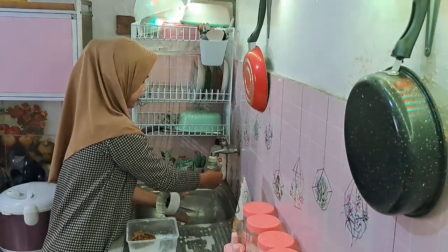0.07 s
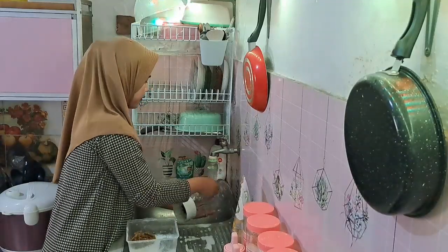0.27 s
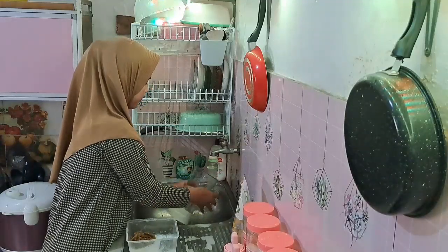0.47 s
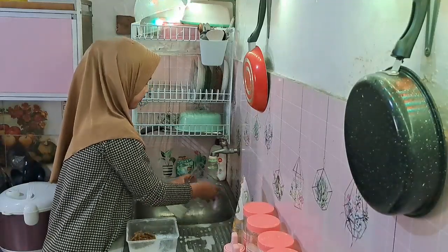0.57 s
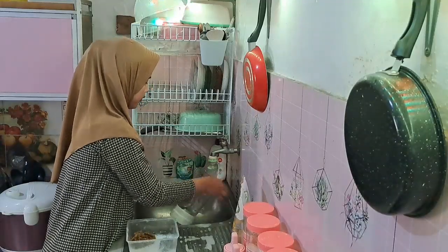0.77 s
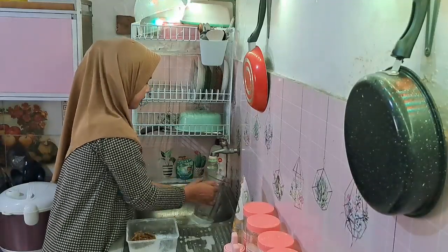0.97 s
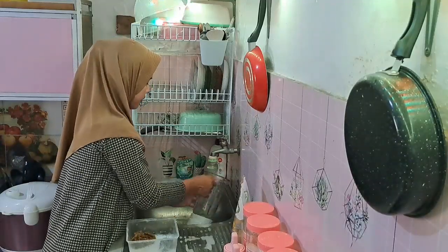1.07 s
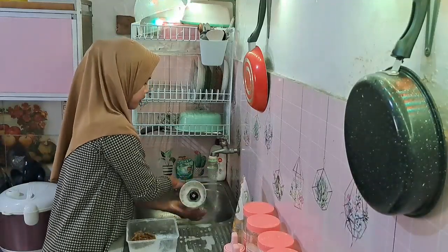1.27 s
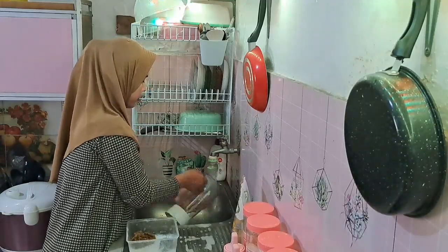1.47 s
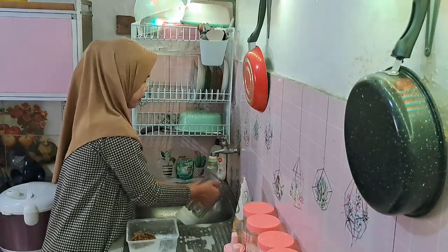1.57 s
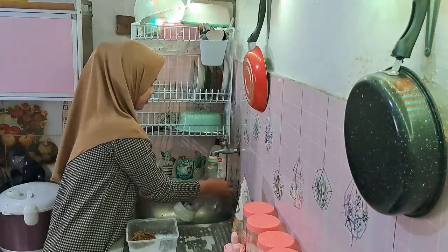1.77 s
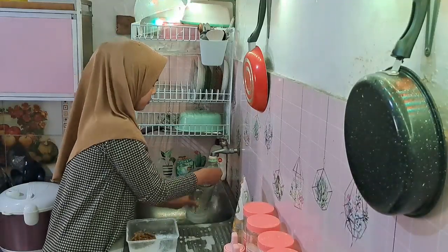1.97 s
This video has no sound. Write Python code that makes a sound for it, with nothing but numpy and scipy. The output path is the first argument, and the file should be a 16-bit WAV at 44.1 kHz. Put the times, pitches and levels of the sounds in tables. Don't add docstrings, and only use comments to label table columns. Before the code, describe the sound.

Hands rinse cups and plates in a steel sink: short splashes, glugs and ticking drops, a hard plate knock early, a quiet pause, more splashing, then a sharp cup bang; close, muffled phone microphone in a small kitchen.

```python
import sys
import numpy as np
from scipy import signal
from scipy.io import wavfile
from scipy.ndimage import uniform_filter1d, map_coordinates

SR = 44100
rng = np.random.default_rng(int(sys.argv[2]) if len(sys.argv) > 2 else 0)


def invert_db(level):
    return 10 ** (np.asarray(level, dtype=float) / 20)


def file_out(sig):
    cols = np.atleast_2d(sig).T
    lim = np.clip(cols, -1, 1)
    pcm = np.round(lim * 32767).astype(np.int16)
    wavfile.write(sys.argv[1], SR, pcm)


N = 89699
T = np.arange(N) / SR

# start_s, length_s, level_db, low_edge_hz,
# high_edge_hz
SPLASHES = [(0.002, 0.056, -29, 3760, 7560), (0, 0.095, -33.5, 610, 7260),
            (0.022, 0.046, -31.5, 2200, 3520), (0.082, 0.14, -46, 2300, 7000),
            (0.182, 0.033, -33, 2400, 7000), (0.226, 0.056, -35.5, 920, 7000),
            (0.265, 0.059, -39.5, 2300, 7500), (0.313, 0.071, -43.5, 2760, 7140),
            (0.386, 0.051, -30.5, 300, 2960), (0.394, 0.024, -35.5, 3280, 7000),
            (0.445, 0.063, -42.5, 564, 6500), (0.921, 0.077, -37, 1840, 2685),
            (0.939, 0.053, -29, 423, 7000), (1.001, 0.085, -30, 467, 2780), (1.029, 0.055, -32, 1740, 7040),
            (1.086, 0.1, -39, 3650, 7000), (1.088, 0.11, -41.5, 2165, 3975), (1.082, 0.13, -42, 382, 1753),
            (1.274, 0.077, -26, 2260, 6800), (1.301, 0.13, -36, 300, 2020),
            (1.333, 0.075, -31.5, 1900, 7000), (1.393, 0.15, -40.5, 353, 3100),
            (1.545, 0.088, -40, 4140, 7300), (1.566, 0.077, -33.5, 316, 2315),
            (0.105, 0.078, -45.5, 783, 1500),
    (0.432, 0.088, -36, 303, 1296),
    (0.798, 0.082, -48, 391, 950),
    (1.612, 0.081, -40, 355, 1580),
    (1.4, 0.15, -43, 4135, 7000),
    (1.966, 0.029, -46, 2720, 4590),
    (1.987, 0.13, -30, 2327, 5530),
            (.775, 0.057, -58.5, 2100, 5400), (0.89, 0.064, -52, 3220, 5040), (.77, .1, -63, 2160, 2500),
        (0.71, .045, -53, 1420, 1800), (1.2, .05, -61, 3100, 8400), (0.525, 0.054, -60, 790, 2100),
        (1.2, 0.052, -64, 2400, 2660), (1.535, 0.067, -44.5, 950, 1300), (1.5, 0.07, -55.5, 680, 1460),
        (1.1, 0.051, -47, 3700, 8100), (1.705, 0.056, -66.5, 4500, 11000), (1.875, 0.048, -70, 4300, 7000),
        (1.835, 0.031, -70.5, 4800, 6300), (0.26, .035, -36.5, 250, 1100), (1.3, 0.065, -44, 200, 660),
        (1.83, .04, -63.5, 490, 850)]
# centre_s, length_s, level_db, pitch_hz
GLUGS = [(.017, 0.072, -43, 737), (.039, 0.016, -21, 1224), (.115, 0.076, -41, 950),
         (.157, 0.037, -36, 1166), (.248, 0.012, -7, 568.6), (.342, 0.039, -33.5, 1598),
         (.345, 0.09, -43.5, 898), (.545, 0.062, -54, 950), (.665, 0.045, -62.5, 1362),
         (.805, 0.04, -51, 1192), (.805, 0.034, -50, 566), (.834, 0.021, -31.5, 574),
         (.895, 0.092, -59, 1295), (.966, 0.023, -20, 846), (.966, 0.054, -31.5, 546),
         (1.014, 0.04, -23.5, 449), (1.03, 0.03, -32, 808), (1.043, 0.022, -21, 1330),
         (1.041, .014, -24.5, 1117), (1.074, 0.012, -31, 1305), (1.175, 0.065, -28.5, 510),
         (1.18, 0.036, -35, 1347), (1.21, 0.038, -33, 478.6), (1.455, 0.045, -36.5, 1632),
         (1.607, 0.0085, -19.5, 867), (1.6, 0.14, -33.5, 530.7), (1.635, 0.049, -40, 1210),
         (1.663, 0.013, -21, 800), (1.715, 0.074, -46.5, 460), (1.712, 0.043, -46, 1340),
         (1.806, 0.034, -65.5, 1143),
    (1.847, 0.041, -54, 1239),
    (1.852, 0.057, -57.5, 932),
    (1.972, 0.074, -67.5, 870),
    (2.013, 0.028, -52.5, 1324),
    (2.03, 0.03, -30, 546.5),
]
# start_s, peak_db, pitch_hz, climb_octaves (over the ring)
DROPS = [(0.0353, -32, 2560, 0.082), (.156, -41, 2830, 0.09), (0.1936, -23.5, 2900, 0.24),
         (.354, -27, 4600, 0.11), (.464, -18.5, 2750, 0.96), (0.473, -34, 5440, .1),
         (0.486, -32, 5370, 0.082), (0.624, -63, 2730, 0.09), (.780, -40, 6370, .1),
         (0.8294, -40, 3020, 0.084), (0.868, -31, 4060, 0.08), (0.9222, -41, 2300, 0.076),
         (1.013, -31, 2460, 0.091), (1.0394, -30, 2300, .1), (1.097, -16, 4670, 0.084),
         (1.287, -12.5, 4350, 0.15), (1.382, -12.5, 4400, .1), (1.408, -26, 2420, 0.17),
         (1.4326, -40, 5700, .1), (1.5633, -28, 4800, .1), (1.594, -32, 2040, 0.067),
         (1.593, -24.5, 1078, .1), (1.621, -31, 644, 0.19), (1.6606, -36, 2615, .1), (1.73, -36, 2490, .1),
         (1.9013, -53, 5120, .1), (1.9374, -40.5, 4800, .1), (2.0038, -15.5, 3690, 0.11)]
# centre_s, length_s, level_db, pitch_hz
THUDS = [(.04, 0.25, -40, 214.2), (.17, 0.084, -40, 175), (.37, 0.15, -50.5, 196), (.43, 0.18, -39, 179.2),
         (.51, 0.054, -36.5, 223), (.55, 0.029, -36, 171.2), (.67, 0.13, -71.5, 184.8),
         (1.27, 0.025, -50, 200), (1.33, 0.18, -33, 204), (1.475, 0.16, -35, 166.6),
         (1.567, 0.016, -18, 153.4), (1.58, 0.03, -32, 179), (1.71, 0.082, -47.5, 169)]
# centre_s, length_s, level_db, centre_hz
SPRAYS = [(0.161, 0.044, -42, 2845), (0.224, 0.02, -32, 6160), (0.361, 0.042, -41.5, 4650),
          (0.517, 0.054, -60.5, 5570), (0.545, 0.044, -56, 3050), (0.785, 0.023, -40.5, 7040),
          (0.801, 0.034, -45.5, 3615), (.935, 0.076, -40, 712.4), (0.832, 0.062, -61, 3520),
          (0.863, 0.073, -47, 7400), (0.869, 0.028, -43, 4160), (.887, 0.015, -51.5, 4220),
          (0.922, 0.053, -53, 5440), (1.288, 0.011, -25.5, 5120), (1.025, 0.035, -55, 2500),
          (1.103, 0.033, -29.5, 4700), (1.134, 0.027, -33.5, 2614), (1.414, 0.017, -33.5, 2614),
          (1.434, 0.013, -32, 5730), (1.453, 0.0293, -41.5, 2650), (1.509, 0.018, -30.5, 2717),
          (1.597, 0.03, -29.5, 2037), (1.669, 0.03, -42.5, 2450), (1.672, 0.083, -52.5, 5490),
          (1.72, 0.086, -50, 2493), (1.725, 0.031, -56, 4435), (1.938, 0.04, -47, 5170),
          (1.965, 0.055, -42.5, 2357)]
# time_s, level_db
PLATE_TOUCHES = [
    (.231, -21),
    (.238, -21),
    (.2435, -9),
    (.2475, -4),
]
# pitch_hz, level_db, time_to_fall_60_db_s
PLATE = [(156, -4, 0.079), (283, -10, 0.055), (389, 2.5, 0.035), (573.5, -2.5, 0.086), (772, -17, 0.089),
         (950, -21.5, 0.1), (1244, -14.5, 0.028)]
# time_s, level_db
CUP_TOUCHES = [
    (1.3788, 0.5),
    (1.3862, -7.5),
]
# pitch_hz, level_db, time_to_fall_60_db_s
BASIN = [(135.1, -6, 0.9), (256.2, -2.5, 0.023), (429, -8, 0.055), (621, -22.5, 0.11), (870, -12, 0.055),
         (1122, -29, 0.065), (1500, -18.5, 0.015), (2300, -31, 0.03)]
# centre_s, length_s, level_db, pitch_hz
HELD = [
    (.472, 0.051, -20.5, 503),
    (.615, 0.029, -73, 1407),
]


def drift(rate_hz):
    knots = rng.standard_normal(int(N / SR * 400) + 4)
    return map_coordinates(knots, [T * np.clip(rate_hz, 1, 390)], order=3)


def band(x, low_hz, high_hz):
    y = signal.sosfilt(signal.butter(4, [low_hz, min(high_hz, 9000)], "band", fs=SR, output="sos"), x)
    return y / np.std(y)


def swell(centre, length):
    rise_share = 0.48
    u = (T - centre) / length
    u = np.where(u < 0, u / rise_share, u / (1 - rise_share))
    return np.cos(np.pi / 2 * np.clip(u, -1, 1)) ** 2


def tones(rows, rise, rough, width, flat=1):
    white, waver = rng.standard_normal(N + SR), drift(66)
    pure = np.sqrt(max(1 - rough ** 2, 0))
    settle = 4000
    out = np.zeros(N)
    for s, length, db, hz in rows:
        a, b = max(int((s - length) * SR), 0), min(int((s + length) * SR), N)
        u = T[a:b] - s
        phase = 2 * np.pi * hz * (u + rise * u ** 2 / length) + 0.89 * waver[a:b]
        tone = np.sqrt(2) * np.sin(phase)
        churn = band(white[a:b + settle], hz * (1 - width / 2), hz * (1 + width / 2))[settle:]
        loudness = invert_db(db) * swell(s, length)[a:b] ** flat
        out[a:b] += loudness * (pure * tone + rough * churn)
    return out


def hum(wet):
    centre_hz, half_width_hz, level_db, wobble_db, lift_db = 100, 38, -72.5, 3.5, 28.5
    rumble = band(rng.standard_normal(N), centre_hz - half_width_hz, centre_hz + half_width_hz)
    busy = np.sqrt(uniform_filter1d(np.abs(wet), size=4000))
    return invert_db(level_db + wobble_db * drift(9.3)) * rumble * (1 + invert_db(lift_db) * busy)


def water():
    grain_db, patchy_db, dip_hz = 0.5, 7.5, 1815
    crackle_per_s, crackle_db = 210, 13
    white = rng.standard_normal((2, N)) * invert_db(grain_db * drift(300))
    crackles = (np.abs(white[::-1, ::-1]) < crackle_per_s / SR).any(axis=0)
    white = white * (1 + invert_db(crackle_db) * crackles)
    edges_hz = np.linspace(14, 88, 26) ** 2
    out = np.zeros(N)
    for k, (low, high) in enumerate(zip(edges_hz, edges_hz[1:])):
        flicker = invert_db(patchy_db * np.minimum(drift(29.865), 1))
        out += band(white[k % 2], low, high) * np.sqrt(high - low) * flicker
    return signal.lfilter(*signal.iirnotch(dip_hz, 4.0, SR), out)


def splashes():
    edge_s, sag_db, surge_db = 0.022, 0.5, 2.5
    source = water()
    out = np.zeros(N)
    for s, length, db, low_hz, high_hz in SPLASHES:
        u = T - s
        since_start = u + (s < .001)
        edge = np.clip(np.minimum(since_start, length - u) / edge_s, 0, 1)
        level = invert_db(db - sag_db * np.clip(u / length, 0, 1))
        out += level * np.sin(np.pi / 2 * edge) ** 2 * band(source, low_hz, high_hz)
    return out * invert_db(surge_db * drift(80))


def glugs():
    return tones(GLUGS, rise=0.036, rough=.45, width=.18)


def drops():
    cycles, rise_s = 10.5, .0016
    out = np.zeros(N)
    for s, db, hz, climb in DROPS:
        u, ring_s = np.clip(T - s, 0, .05), cycles / hz
        phase = 2 * np.pi * hz * (u + np.log(2) * climb * u ** 2 / (4 * ring_s))
        fade = (1 - np.exp(-u / rise_s)) * np.exp(-(u / ring_s) ** 2)
        out += invert_db(db + 1) * fade * np.sin(phase)
    return out


def thuds():
    return tones(THUDS, rise=0, rough=0.89, width=0.72)


def sprays():
    grain_db = 3
    return tones(SPRAYS, rise=0, rough=0.81, width=.22) * invert_db(grain_db * drift(130))


def knock(touches, modes, damped_s):
    contact_s, damp_s, rattle_db = 0.00077, 0.004, 7
    rattle = [invert_db(rattle_db * hz / 1000 * drift(150)) for hz, _, _ in modes]
    out = np.zeros(N)
    for s, db in touches:
        u = np.clip(T - s, 0, 1)
        onset = 1 - np.exp(-u / contact_s)
        for k, (hz, level_db, t60) in enumerate(modes):
            ring = invert_db(db + level_db - 60 * u / t60) * np.sin(2 * np.pi * hz * u)
            out -= (-1) ** k * rattle[k] * onset * ring
    return out * np.exp(-np.maximum(T - damped_s, 0) / damp_s)


def plate_knock():
    return knock(PLATE_TOUCHES, PLATE, damped_s=0.31)


def held_notes():
    return tones(HELD, rise=0.036, rough=0.083, width=.18, flat=0.63)


def cup_knock():
    return knock(CUP_TOUCHES, BASIN, damped_s=1.3975)


def scene():
    wet = splashes() + glugs() + drops() + sprays() + held_notes()
    basin = thuds() + plate_knock() + cup_knock()
    return (wet + basin + hum(wet))[None]


def suppress_noise(x):
    gate_db, depth_db = -92, -27
    hz, _, spec = signal.stft(x, SR, nperseg=1024, noverlap=768)
    power = uniform_filter1d(np.abs(spec) ** 2, size=9, axis=1)
    share = power / (power + invert_db(gate_db) ** 2)
    gain = np.where(hz[:, None] > 250, np.maximum(share, invert_db(depth_db)), 1)
    return signal.istft(spec * gain, SR, nperseg=1024, noverlap=768)[1][:, :N]


def add_hiss(x):
    hiss_db, air_db = -89, -55.5
    treble = uniform_filter1d(np.abs(np.diff(x, prepend=0)), size=3000)
    return x + (invert_db(hiss_db) + invert_db(air_db) * treble) * rng.standard_normal(N)


def top_cut(x):
    return signal.sosfilt(signal.butter(12, 15720, fs=SR, output="sos"), x)


def record(dry):
    top_hz, low_hz = 7712, 64.4
    x = suppress_noise(dry)
    x = 1.825 * np.tanh(x / 1.689)
    x = signal.sosfilt(signal.cheby2(14, 70, top_hz, fs=SR, output="sos"), x)
    x = signal.sosfilt(signal.butter(2, low_hz, "high", fs=SR, output="sos"), x)
    return top_cut(add_hiss(x))


dry = scene()
out = record(dry)
file_out(out)
```